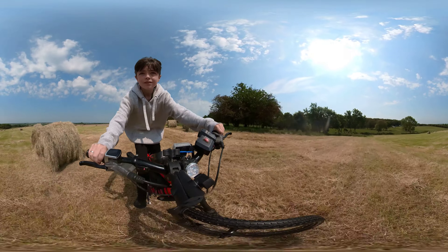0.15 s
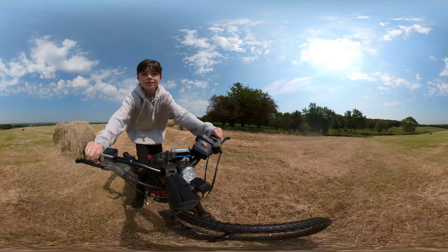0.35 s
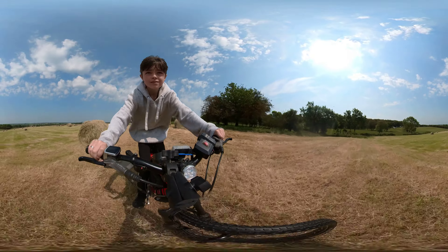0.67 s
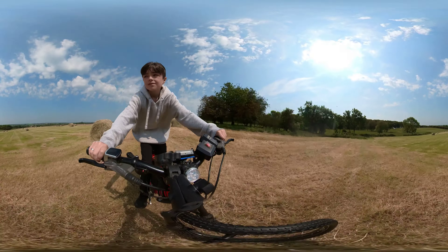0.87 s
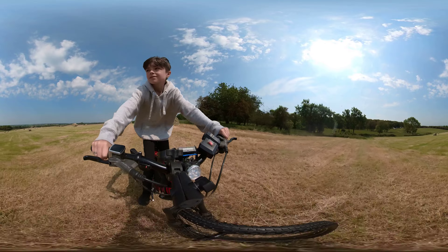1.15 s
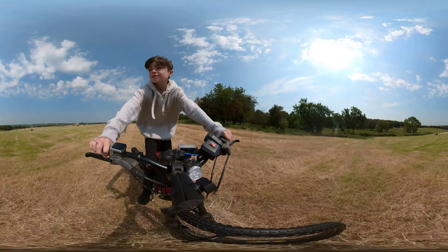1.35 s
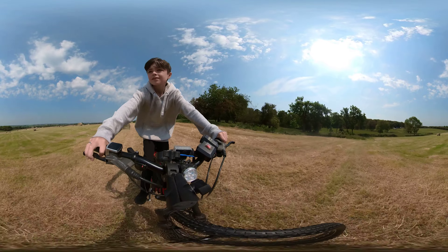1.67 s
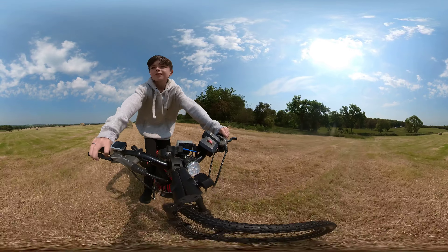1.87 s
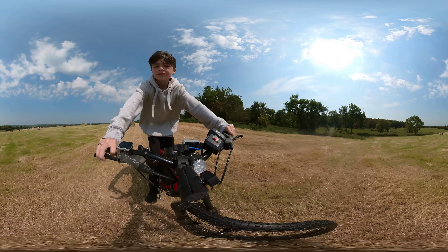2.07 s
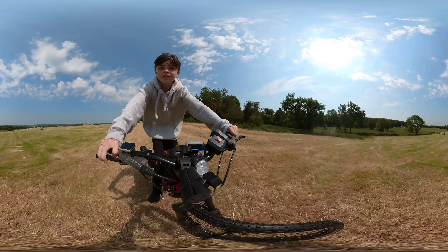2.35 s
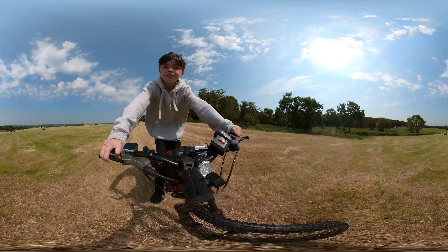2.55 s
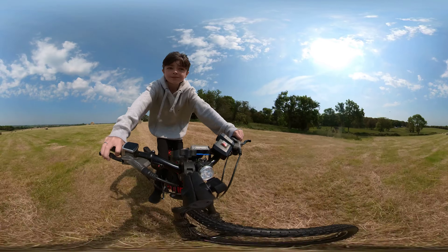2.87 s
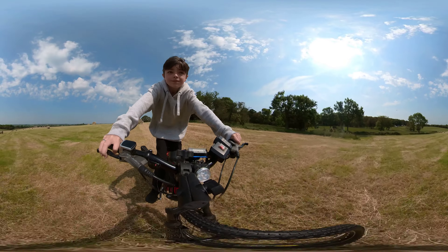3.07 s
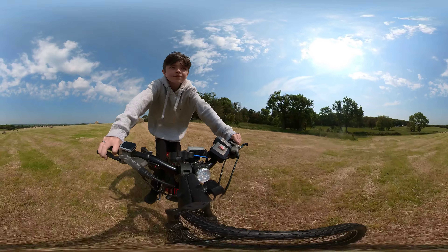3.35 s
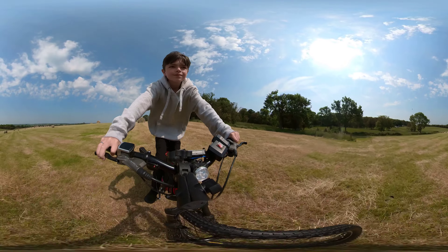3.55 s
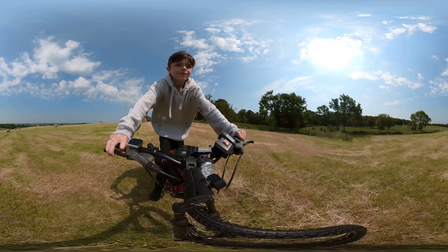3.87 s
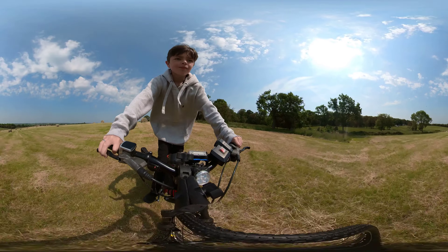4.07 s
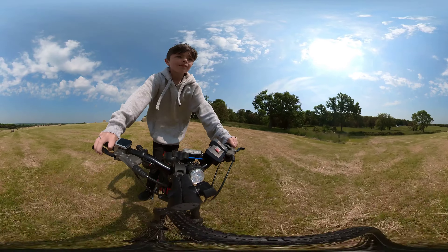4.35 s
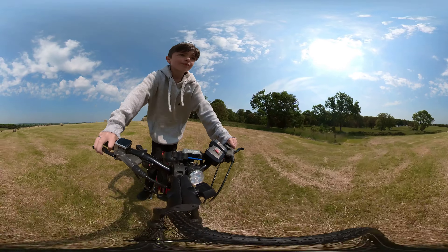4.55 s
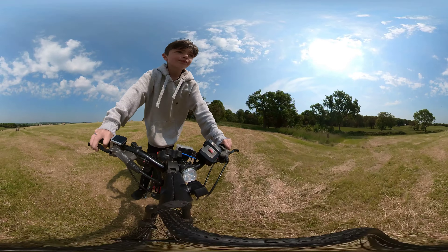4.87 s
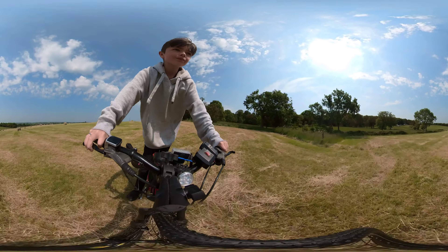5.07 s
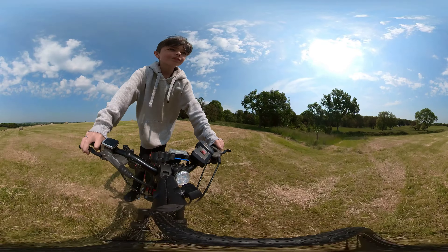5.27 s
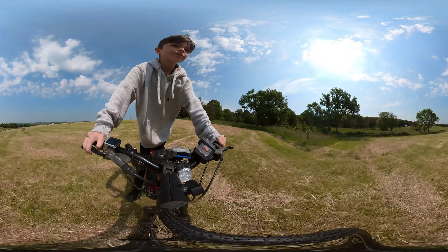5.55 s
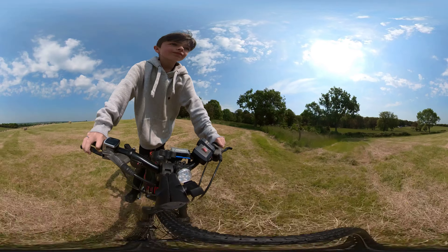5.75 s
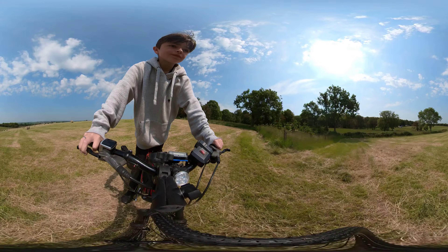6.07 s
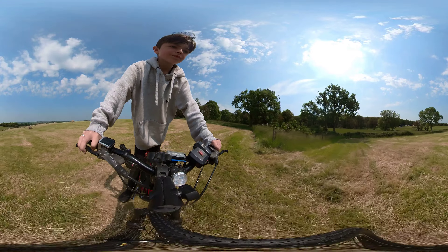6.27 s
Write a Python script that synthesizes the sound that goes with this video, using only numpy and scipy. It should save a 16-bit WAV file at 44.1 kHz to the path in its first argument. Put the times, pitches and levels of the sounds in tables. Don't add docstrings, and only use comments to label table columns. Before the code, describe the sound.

Close, dull on-bike sound outdoors: low wind buffets, rough ground rumble and dry crackling under knobbly tyres. Irregular knocks, hollow tube rings, tiny metal clinks and stalk snaps cluster throughout. A moderate crack hits the housing midway, later a much harder one with a faint falling squeak. Gusts weaken, rattles thin out, and a soft rut thump comes near the end.

```python
import sys
import numpy as np
from scipy import signal
from scipy.fft import rfft, irfft, next_fast_len
from scipy.io import wavfile
from scipy.ndimage import uniform_filter1d

SR = 44100
rng = np.random.default_rng(int(sys.argv[2]) if len(sys.argv) > 2 else 0)


def magnitude_from_level(level_db):
    exponent = np.asarray(level_db, float) / 20
    return 10 ** exponent


def inscribe(sig):
    pcm = np.round(np.clip(np.atleast_2d(sig).T, -1, 1) * 32767)
    wavfile.write(sys.argv[1], SR, pcm.astype(np.int16))


N = 282901

# start_s, hold_s, thump_db
GUSTS = [(0, 0.38, -34), (.5, 0.18, -29.5), (.8, 0.023, -34.5), (.98, .04, -29), (1.16, 0.046, -29),
         (1.32, 0.054, -30), (1.44, 0.14, -32.5), (1.62, 0.0053, -36), (1.77, 0.0073, -28.5),
         (1.86, 0.12, -29), (2.09, 0.022, -40), (2.27, 0.14, -33.5), (2.52, 0.035, -23.5),
         (2.69, 0.078, -27.5), (2.8, 0.14, -32), (3.11, 0.23, -35.5), (3.62, 0.11, -35),
         (3.92, 0.29, -35.5), (4.09, 0.15, -35), (4.35, 0.13, -36.5), (4.68, 0.08, -38.5),
         (4.83, 0.019, -42), (5.07, 0.082, -33), (5.3, 0.034, -36.5), (5.85, 0.11, -59),
         (6.055, 0.046, -37.5), (6.2, 0.066, -44)]
# start_s, flutter_db
SLAPS = [(0.451, -28.5), (0.727, -30), (0.797, -30.5), (0.873, -32), (0.978, -33), (1.21, -34.5),
         (1.319, -38), (1.446, -23), (1.53, -32), (1.619, -35.5), (1.8, -38), (1.927, -29.5),
         (2.089, -36.5), (2.299, -28.5), (2.37, -37), (2.551, -33), (2.694, -29.5), (2.977, -45),
         (3.118, -34), (3.362, -41.5), (3.729, -43), (4.089, -31.5), (4.409, -36.5), (4.47, -55),
         (4.69, -56), (5.077, -36), (6.06, -51)]
# time_s, level_db
BREEZE = [(0, -48), (2.0, -35), (3.0, -41.5), (4.5, -51.5), (5.5, -55.5), (5.9, -50.5), (6.0, -76),
          (6.41, -61)]
# freq_hz, density_db
GUST_SPECTRUM = [(8.8, -34), (17, 7.5), (35, -0.5), (54, 0.5), (98, -8), (171, -24), (231, -23),
                 (278, -24.5), (300, -22), (390, -33.5), (660, -120)]
# time_s, bumpiness_db, straw_db
GROUND = [(0.0, -44.5, -78.5), (0.23, -63, -77.5), (0.37, -50, -74), (0.77, -47, -76.5), (1.07, -50.5, -78),
          (1.21, -47.5, -72.5), (1.53, -44, -67), (1.71, -46.5, -67.5), (2.39, -44, -70.5),
          (2.78, -49, -72), (3.16, -44.5, -73.5), (3.41, -50.5, -75), (3.8, -44.5, -72.5),
          (4.27, -50.5, -72), (4.59, -50, -77.5), (5.19, -47.5, -74), (6.05, -56, -86.5),
          (6.41, -61, -90.5)]
# start_s, hold_s, depth_db
HOLLOWS = [(.07, .07, 6), (.62, .1, 3), (2.2, .07, 3), (3.02, .03, 5), (4.96, .07, 8), (5.44, .07, 7),
           (5.77, .07, 7), (5.92, .1, 7), (6.13, .05, 6), (6.29, .05, 8)]
# freq_hz, width_hz, level_db
FRAME_MODES = [(421, 137, -1), (536, 32, 8), (710, 520, -7), (826, 34, 5.5)]
# freq_hz, density_db
RUMBLE_SPECTRUM = [(94, -28.5), (160, -10.5), (231, -3.5), (289, 3.5), (355, -5), (537, -1), (708, -2.5),
                   (832, -7.5), (1000, -20.5), (1300, -45), (2200, -120)]
RUB_SPECTRUM = [(600, -22), (930, 1.5), (1060, -8), (1200, -3), (1380, -1), (1560, -6.5), (1700, -7.5),
                (1900, -13.5), (2470, -24.5), (4180, -120)]
CRACKLE_SPECTRUM = [(1000, -18), (1700, -3.5), (1840, -7), (2420, -10), (3130, -12), (3700, -20),
                    (4150, -33.5), (4610, -42), (5100, -39), (6630, -73), (11200, -120)]
HISS_SPECTRUM = [(2880, -46), (4900, -65), (5500, -10.5), (6510, 3), (7480, 8), (7940, 3), (8270, 1.5),
                 (8900, -15.5), (9370, -34), (12200, -69.5), (20600, -120)]
# pitch_hz, level_db, t60_s
METAL = [(4300, -28, .02), (5740, -17.5, .06), (6400, -11, .025), (6700, -6, .035), (7400, -14, .02),
         (7995, -6, .025)]
# start_s, hold_s, level_db
SHAKES = [(.28, 0.23, -29.5), (.8, 0.011, -32), (1.23, .02, -51), (1.55, 0.02, -30.5), (2.05, 0.034, -39),
          (2.3, 0.32, -38.5), (3.11, 0.43, -45), (3.68, 0.1, -43), (4.07, 0.0049, -27.5),
          (4.53, 0.012, -44), (4.86, 0.012, -57), (5.16, 0.012, -38), (5.6, 0.039, -57),
          (6.045, 0.012, -40.5)]
# pitch_hz, level_db
JINGLE = [(2250, -91.5), (6900, -93.5), (7990, -87.5)]
# start_s, thud_db, clack_rel_db, snap_rel_db, t60_s
KNOCKS = [(.14, -37, -1, -9, 0.15), (.258, -29, -16, -33, 0.025), (0.433, -40, -19, -17, 0.04),
          (.874, -31.5, -24, -39, 0.23), (.956, -21.5, 3, -25.5, 0.022), (1.244, -21.5, -36, -41, 0.013),
          (1.433, -27, 4, -15, 0.1), (1.476, -31, 19, -9, 0.049), (1.551, -22.5, 0, -20, 0.034),
          (1.986, -19.5, 2, -11, 0.0077), (2.071, -44, 7, 13.5, 0.0075), (2.334, -30, 17, -3, 0.011),
          (2.411, -38, 12, -13, 0.094), (2.463, -19.5, -8, -16, 0.011), (2.681, -37, -16, -11, 0.064),
          (3.561, -28, -2, -16, 0.015), (3.647, -32.5, -23, -15.5, 0.17), (3.809, -24, 7, -12, 0.015),
          (4.076, -19, 8.5, -11, 0.034), (4.329, -22, 5, -14, 0.061), (4.462, -28, -23, -13, 0.11),
          (5.062, -27.5, -2, -10.5, 0.033), (5.185, -26.5, 7, -20, 0.014), (5.285, -50, -9, 15.5, 0.024)]
# start_s, thud_db, brightness_db, t60_s
TAPS = [(0.855, -48, -8, 0.025), (1.047, -43.5, -5, .028), (1.791, -21.5, -9, 0.016),
        (1.892, -30, -30, 0.039), (2.039, -32, -1, 0.028), (2.144, -27.5, -10, 0.13),
        (2.498, -21, -8, 0.0086), (2.845, -27.5, -20, 0.042), (2.884, -27, -32, 0.11),
        (3.054, -24.5, -11, 0.021), (3.16, -23.5, -15, 0.029), (3.255, -26.5, -23, 0.01),
        (3.32, -29, -22, 0.019), (3.344, -29.5, -23, 0.071), (3.497, -26.5, -9, 0.031),
        (3.599, -30, 0, 0.014), (3.852, -44.5, 13, 0.017), (4.003, -20.5, -14, 0.027),
        (4.116, -30.5, -3, 0.1), (4.376, -30, -6, 0.064), (4.442, -31, -1, 0.075), (4.622, -33, -18, 0.03),
        (4.83, -35, 4, 0.068), (5.166, -24.5, -14, 0.056), (5.562, -35.5, -6, 0.11),
        (5.61, -29.5, -11.5, 0.072), (5.725, -33, -11, 0.057), (6.039, -32, -6.5, 0.053),
        (6.345, -37.5, -0.5, 0.3), (6.384, -24, -15.5, 0.12)]
# start_s, peak_db, t60_s, lean_to_high_db
CLINKS = [(0.1404, -60, 0.093, -1), (0.2388, -56, 0.022, 7), (0.5814, -63, 0.023, 6),
          (1.112, -64, 0.042, 8), (1.22, -51, 0.029, -9), (1.447, -37, 0.045, 5), (1.553, -40.5, 0.025, -8),
          (1.903, -52.5, 0.03, -3), (2.152, -48, 0.026, 5), (2.536, -68, 0.013, 6),
          (2.681, -50.5, 0.087, 3), (3.1556, -53, 0.016, 2), (3.1971, -56, 0.015, -10),
          (3.5616, -46.5, 0.037, -3), (3.646, -56.5, 0.029, 0), (3.684, -51, 0.022, 1),
          (3.75, -50, 0.014, 8), (3.808, -39.5, 0.037, -1), (3.9973, -58, 0.022, 3),
          (4.023, -52.5, 0.034, -3.5), (4.0788, -51, 0.042, -1), (4.335, -30.5, 0.031, 3),
          (4.4053, -56, 0.03, 16), (4.4625, -37.5, 0.036, 0), (5.07, -46, 0.048, 7),
          (5.186, -45.5, 0.03, 16), (5.287, -59, 0.012, 2), (5.3198, -56, 0.02, -3),
          (6.404, -50.5, 0.044, -2)]
# start_s, peak_db, pitch_hz, t60_s
TICKS = [(0.1411, -44.5, 2010, 0.016), (1.4341, -41.5, 2020, 0.015), (1.477, -37, 2480, 0.019),
         (1.5517, -37, 2410, 0.02), (1.6482, -54, 1990, 0.018), (1.6786, -49, 3000, 0.018),
         (1.7594, -55, 1940, 0.02), (1.9844, -39, 2120, 0.02), (2.0714, -36, 2280, 0.017),
         (2.144, -42, 1940, 0.018), (2.3331, -35, 2070, 0.016), (2.4119, -42, 1880, 0.026),
         (2.4637, -46, 2530, 0.025), (2.4992, -49, 2080, 0.02), (2.6224, -45, 1960, 0.02),
         (2.6823, -44, 2360, 0.02), (3.1535, -40, 2280, 0.0099), (3.3712, -44, 2050, 0.018),
         (3.4999, -41.5, 2020, 0.026), (3.561, -37, 1660, 0.036), (3.601, -43, 2000, 0.02),
         (3.6572, -34, 2020, 0.013), (3.6817, -41.5, 2440, 0.022), (3.8102, -34, 1860, 0.028),
         (4.0637, -42, 2120, 0.02), (4.0786, -52, 1980, 0.046), (4.3343, -34, 2430, 0.015),
         (4.3746, -41, 2010, 0.02), (4.4607, -38, 2240, 0.02), (4.6194, -53, 2180, 0.018),
         (4.782, -45, 2120, 0.02), (4.8745, -43.5, 1970, 0.019), (5.07, -39.5, 1720, 0.025),
         (5.183, -43, 2440, 0.024), (5.2889, -41, 1980, 0.022), (5.5618, -46.5, 2040, 0.018),
         (5.659, -48, 2000, 0.024), (6.0257, -57, 1990, 0.02), (6.042, -50, 2050, 0.022),
         (6.385, -39.5, 2020, 0.018)]
# start_s, peak_db, pitch_hz, t60_s
TUBES = [(0.211, -35, 632, 0.059), (0.257, -28, 514, 0.044), (0.333, -31, 580, 0.065),
         (0.855, -30.5, 597, 0.062), (0.875, -22.5, 600, 0.06), (0.957, -26, 660, 0.039),
         (1.185, -30, 656, 0.045), (1.245, -35, 590, 0.039), (1.447, -24, 690, 0.05),
         (1.4765, -21, 1530, 0.036), (1.4835, -18.5, 496, 0.053), (1.553, -19.5, 748, 0.043),
         (1.793, -36, 550, 0.05), (1.891, -26.5, 750, 0.029), (1.987, -37, 526, 0.046),
         (2.039, -27.5, 703, 0.026), (2.15, -44, 553, 0.036), (2.382, -42, 533, 0.05),
         (2.462, -34, 500, 0.038), (2.492, -25, 635, 0.044), (2.666, -29.5, 690, 0.039),
         (2.684, -22.5, 536, 0.066), (2.845, -43, 526, 0.05), (2.886, -31, 536, 0.047),
         (3.163, -31, 690, 0.05), (3.193, -29, 560, 0.035), (3.255, -31, 535, 0.037),
         (3.32, -29, 625, 0.036), (3.345, -28, 660, 0.056), (3.562, -31.5, 548, 0.17),
         (3.6, -30.5, 686, 0.088), (3.652, -21, 586, 0.037), (3.684, -24.5, 513, 0.058),
         (3.81, -20.5, 565, 0.056), (4.079, -32, 622, 0.035), (4.334, -26, 567, 0.19),
         (4.376, -29, 656, 0.047), (4.467, -23.5, 508, 0.046), (4.617, -29, 506, 0.052),
         (5.168, -26, 732, 0.049), (5.185, -27, 545, 0.086), (5.258, -36, 590, 0.055),
         (5.563, -36, 580, 0.062), (5.611, -30.5, 530, 0.055), (6.367, -34.5, 557, 0.11),
         (6.384, -26, 735, 0.044)]
# start_s, hold_s, level_db
SCUFFS = [(.22, 0.13, -39), (.37, 0.036, -34.5), (.43, 0.014, -31), (.47, 0.064, -38.5), (.87, 0.087, -35),
          (.95, 0.27, -35), (3.64, 0.1, -45), (4.67, 0.28, -45.5), (5.58, 0.15, -51.5),
          (6.21, 0.074, -46.5)]
# freq_hz, density_db
SCUFF_SPECTRUM = [(210, -41), (350, -1.5), (495, -4.5), (600, 6.5), (835, -10.5), (1040, -7), (1340, -4.5),
                  (1730, -20), (2200, -21.5), (2860, -51.5), (4840, -120)]
# start_s, peak_db, t60_s
RUTS = [
    (0.26, -32, 0.17),
    (6.051, -32, 0.097),
]
# start_s, peak_db, pitch_hz, t60_s
THUMPS = [(0.36, -36, 130, 0.1), (0.445, -30, 127, 0.16), (0.781, -37, 112, 0.096), (0.876, -29, 111, 0.15),
          (1.505, -36, 151, 0.098), (1.785, -30, 132, 0.12), (1.885, -28, 111, 0.12),
          (1.978, -32, 111, 0.12), (2.074, -37, 178, 0.11), (2.271, -40, 108, 0.14),
          (2.351, -35, 111, 0.13), (2.533, -43, 135, 0.12), (2.588, -22.5, 139, 0.092),
          (2.694, -45, 110, 0.12), (2.745, -34, 142, 0.21), (2.797, -29, 114, 0.11),
          (2.903, -25.5, 113, 0.098), (2.961, -40, 202, 0.12), (3.093, -40, 113, 0.11),
          (3.174, -34, 254, 0.15), (3.339, -37, 109, 0.13), (4.072, -36, 108, 0.11),
          (4.331, -33.5, 201, 0.14), (4.401, -39, 106, 0.14), (4.67, -37, 222, 0.15),
          (5.071, -43, 111, 0.14), (5.179, -34, 140, 0.1), (5.344, -47, 132, 0.12), (6.045, -48, 110, 0.12)]
# start_s, peak_db
CRACKS = [
    (2.4636, -18.5),
    (4.0793, -8.5),
]
# time_s, pitch_hz, level_db
SQUEAK = [
    (4.085, 2700, -85),
    (4.095, 2680, -63),
    (4.16, 2380, -63),
    (4.215, 2150, -66),
    (4.25, 2100, -90),
]

RUMBLE_DB, RUB_DB, CRACKLE_DB, HISS_DB, TREAD_DB = -40, -50.5, -64.5, -73, -60
JOLT_DB = 1.1


def rms_one(x):
    return x / np.sqrt(np.mean(x ** 2) + 1e-20)


def in_time(rows):
    s, *columns = np.transpose(rows)
    return [np.interp(np.arange(N) / SR, s, c) for c in columns]


def swells(rows, rise_db_s, fall_db_s):
    t = np.arange(0, N + 64, 64) / SR
    s, hold, level_db = np.transpose(rows)[:, :, None]
    loss_db = rise_db_s * np.maximum(s - t, 0) + fall_db_s * np.maximum(t - s - hold, 0)
    gain = np.sqrt(np.sum(magnitude_from_level(level_db - loss_db) ** 2, axis=0))
    return np.interp(np.arange(N) / SR, t, gain)


def drift(rate_hz):
    r = np.exp(-40 * np.pi * rate_hz / SR)
    slow = signal.lfilter([1], [1, -2 * r, r * r], rng.standard_normal(N // 20 + 4002))[4000:]
    return np.interp(np.arange(N) / 20, np.arange(len(slow)), rms_one(slow))


def butter(x, order, hz, kind="low"):
    return signal.sosfilt(signal.butter(order, hz, kind, fs=SR, output="sos"), x)


def colour(x, spectrum, size=16384):
    hz, level_db = np.transpose(spectrum)
    grid = np.log(np.arange(size // 2 + 1) * SR / size + 1)
    cepstrum = irfft(np.interp(grid, np.log(hz), level_db) * np.log(10) / 20)
    cepstrum[1:size // 2] *= 2
    response = irfft(np.exp(rfft(cepstrum[:size // 2], size)))[:size // 2]
    return signal.fftconvolve(x, response / np.linalg.norm(response))[:N]


def resonance(x, hz, width_hz):
    r = np.exp(-np.pi * width_hz / SR)
    poles = [1, -2 * r * np.cos(2 * np.pi * hz / SR), r * r]
    return signal.lfilter([(1 - r * r) / 2, 0, (r * r - 1) / 2], poles, x + 1e-18)


def evened(x, span_s, share):
    span = int(span_s * SR)
    power = uniform_filter1d(uniform_filter1d(x ** 2, span), span)
    return rms_one(x / (power + 1e-12) ** (share / 2))


def patchy(x, low_hz, high_hz, patch_db, rate_hz, count):
    size = next_fast_len(N)
    log_hz = np.log(np.arange(size // 2 + 1) * SR / size + 1)
    place = np.interp(log_hz, np.log([low_hz, high_hz]), [0, count - 1])
    whole = rfft(x, size)
    out = np.zeros(N)
    for k in range(count):
        band = irfft(whole * np.clip(1 - abs(place - k), 0, 1), size)[:N]
        out += band * magnitude_from_level(patch_db * drift(rate_hz))
    return out


def grains(per_s, spread_db, clump_db, smooth):
    sizes = magnitude_from_level(spread_db * np.minimum(rng.exponential(1, N), 5)) * rng.choice([-1, 1], N)
    born = rng.random(N) < per_s * magnitude_from_level(clump_db * drift(25)) / SR
    share = np.clip(smooth, 0, 1)
    return np.sqrt(1 - share) * rms_one(sizes * born) + np.sqrt(share) * rng.standard_normal(N)


def pings(per_s, cycles, count):
    sizes = magnitude_from_level(2.8 * np.minimum(rng.exponential(1, N), 4)) * (rng.random(N) < per_s / SR)
    dealt = rng.integers(0, count, N)
    out = np.zeros(N)
    for k, hz in enumerate(np.geomspace(900, 8600, count)):
        out += rms_one(resonance(sizes * (dealt == k), hz, hz / cycles)) * np.sqrt(hz)
    return rms_one(out)


def bursts(times_s, levels_db, t60s, rise):
    out, t = np.zeros(N + 4096), np.arange(4096) / SR
    chatter = rng.standard_normal((len(times_s), 4096))
    rows = zip(times_s, levels_db, np.maximum(t60s, .002), rise + 0 * times_s, chatter)
    for s, level_db, t60, share, noise in rows:
        at = int(s * SR)
        out[at:at + 4096] += magnitude_from_level(level_db - 60 * t / t60) * (1 - np.exp(-t / (share * t60))) * noise
    return out[:N]


def strikes(rows, gain_db, touch_s, partials):
    out, t = np.zeros(N + 4096), np.arange(4096) / SR
    luck = rng.uniform(0, 1, (len(rows), len(partials)))
    for (s, peak_db, hz, t60), chance in zip(rows, luck):
        tone = np.zeros(4096)
        for (ratio, db), c in zip(partials, chance):
            partial_hz = hz * ratio ** (1 + 0.24 * (c - .5))
            decay = magnitude_from_level(-60 * t * ratio / max(t60, .003))
            tone += magnitude_from_level(db) * np.sin(2 * np.pi * partial_hz * t) * decay
        at = int(s * SR)
        out[at:at + 4096] += magnitude_from_level(peak_db + gain_db) * (1 - np.exp(-t / touch_s)) * tone
    return out[:N]


def frame(x, ring_gain=1):
    modes = np.zeros(N)
    for k, (hz, width_hz, level_db) in enumerate(FRAME_MODES):
        modes += (-1) ** k * magnitude_from_level(level_db) * resonance(x, hz, width_hz)
    return colour(x + 1.82 * ring_gain * modes, RUMBLE_SPECTRUM)


def wind():
    pressure = magnitude_from_level(in_time(BREEZE)[0]) + swells(GUSTS, rise_db_s=500, fall_db_s=211.5)
    slap_rows = [(s, 0.00051, db) for s, db in SLAPS]
    slaps = swells(slap_rows, rise_db_s=447.5, fall_db_s=351.5)
    eddies = colour(rng.standard_normal(N), GUST_SPECTRUM)[::-1]
    eddies = butter(eddies, 2, 24, "high")
    thump = signal.sosfiltfilt(signal.butter(2, 70, fs=SR, output="sos"), eddies)
    flutter = evened(eddies - thump, 0.29, 0.74)
    push = pressure * evened(thump, 0.069, 0.99) + (magnitude_from_level(-16.5) * pressure + slaps) * flutter
    return push + 0.048 * butter(push ** 2, 1, 15, "high")


def ground_db():
    bumps_db, straw_db = (c - c.mean() for c in in_time(GROUND))
    light_db = 20 * np.log10(2.0 + swells(HOLLOWS, rise_db_s=149, fall_db_s=149))
    return bumps_db - light_db, straw_db, light_db


def stubble():
    bumps_db, straw_db, _ = ground_db()
    jolts = drift(1.2)
    stalks = 1.106 * grains(500, spread_db=-1.0, clump_db=3.5, smooth=0.25)
    stalks = stalks + .4 * pings(1200, cycles=43.0, count=30)

    shaken = frame(grains(300, spread_db=2.5, clump_db=3.5, smooth=0.55))
    rumble = magnitude_from_level(RUMBLE_DB + bumps_db + JOLT_DB * jolts) * evened(shaken, .03, .3)

    rubbing = grains(660, spread_db=3.5, clump_db=2.5, smooth=0.65) + 0.5 * stalks
    rub = magnitude_from_level(RUB_DB + 0.66 * bumps_db + 1.4 * JOLT_DB * jolts) * colour(rubbing, RUB_SPECTRUM)

    crackle_db = CRACKLE_DB + 0.22 * bumps_db + 0.85 * straw_db
    crackle = magnitude_from_level(crackle_db + 0.3 * jolts + 2.6 * drift(32)) * colour(stalks, CRACKLE_SPECTRUM)

    straw = 0.25 * stalks + 0.64 * grains(1800, spread_db=2.0, clump_db=4, smooth=0.7)
    flicker_db = 3.0 * drift(120)
    hiss = magnitude_from_level(HISS_DB + straw_db + .6 * jolts + flicker_db) * colour(straw, HISS_SPECTRUM)
    metal = sum(magnitude_from_level(4 * drift(8)) * resonance(hiss, hz, 60) for hz, _, _ in METAL[1:])
    hiss = .95 * hiss + .6 * metal
    return patchy(rumble + rub + crackle + hiss, 131, 11100, patch_db=2.4, rate_hz=10, count=24)


def tread():
    light_db = ground_db()[2]
    drone = resonance(resonance(rng.standard_normal(N), 1313, 286), 1313, 286)
    return magnitude_from_level(TREAD_DB - .6 * light_db + 3 + 2.4 * drift(18)) * rms_one(drone)


def pole():
    hz, width_hz, idle_db = 283.8, 15, -8.5
    hum = resonance(resonance(rng.standard_normal(N), hz, width_hz), hz, width_hz)
    idle = magnitude_from_level(RUMBLE_DB + ground_db()[0] + idle_db)
    shaken = swells(SHAKES, rise_db_s=599, fall_db_s=146.5) + idle
    return magnitude_from_level(-10.5) * shaken * evened(hum, 0.03, 0.4)


def jingle():
    out = np.zeros(N)
    for hz, level_db in JINGLE:
        out += magnitude_from_level(level_db + 4 * drift(7.7)) * rms_one(resonance(rng.standard_normal(N), hz, 70))
    return out


def knocks():
    tap_early_s, contact_lag_s = .001, .001
    taps = [(s - tap_early_s, db, 12.5 + bright, -11 + bright, t60) for s, db, bright, t60 in TAPS]
    s, blow_db, clack_db, snap_db, t60 = np.transpose(KNOCKS + taps)
    s = s + contact_lag_s
    swell = np.repeat([.038, .1], [len(KNOCKS), len(taps)])
    thud = frame(bursts(s, blow_db - 3.0, 1.55 * t60, rise=swell), ring_gain=.35)
    clack = colour(bursts(s, blow_db + clack_db - 16.0, 1.07 * t60, rise=swell), RUB_SPECTRUM)
    snap = colour(bursts(s, blow_db + snap_db - 3.5, 0.93 * t60, rise=swell), CRACKLE_SPECTRUM)
    return thud + clack + snap


def clinks():
    s, peak_db, t60, lean_db = np.transpose(CLINKS)
    luck = rng.standard_normal((len(s), len(METAL)))
    out = colour(bursts(s, peak_db - 6.5, t60, rise=0.047), HISS_SPECTRUM)
    for k, (hz, level_db, ring_s) in enumerate(METAL):
        side = np.clip(np.log2(hz / 7300) * 4, -.5, .5)
        part_db = peak_db + level_db + side * lean_db + 2 * luck[:, k]
        rows = list(zip(s, part_db, hz + 30 * luck[:, -k], 0.42 * (ring_s + t60)))
        out += magnitude_from_level(2 * drift(150)) * strikes(rows, 4, .002, [(1, 0)])
    return out


def ticks():
    rows = [(s, min(db, -37), hz, t60) for s, db, hz, t60 in TICKS]
    return strikes(rows, -4.5, 0.00054, [(1, -1.5), (1.0, -3), (1.3, -2.5), (1.55, -23)])


def tubes():
    return butter(strikes(TUBES, -2.4, 0.0008, [(1, 0), (1.35, -11), (2.4, -15.5)]), 4, 2400)


def scuffs():
    gain = magnitude_from_level(-6.0) * swells(SCUFFS, rise_db_s=448, fall_db_s=399)
    return gain * colour(rng.standard_normal(N), SCUFF_SPECTRUM)


def ruts():
    s, peak_db, t60 = np.transpose(RUTS)
    return butter(bursts(s, peak_db + 16.5, t60, rise=0.032), 2, [90, 240], "band")


def thumps():
    return strikes(THUMPS, 0.66, 0.0038, [(1, -1), (1.4, -5)])


def cracks():
    push = np.zeros(N)
    s, peak_db = np.transpose(CRACKS)
    push[(s * SR).astype(int)] = magnitude_from_level(peak_db + 29)
    blunt = butter(push, 4, 1000)
    return butter(blunt, 1, 220, "high") + 0.007 * colour(push, CRACKLE_SPECTRUM)


def squeak():
    hz, level_db = in_time(SQUEAK)
    phase = 2 * np.pi * np.cumsum(hz + 40 * drift(90)) / SR
    return magnitude_from_level(level_db + 3 * drift(60)) * np.sin(phase)


def scene():
    riding = wind() + stubble() + tread() + pole() + jingle()
    contacts = knocks() + clinks() + ticks() + tubes() + scuffs() + ruts() + thumps()
    return (riding + contacts + cracks() + squeak())[None]


def top_cut(x):
    return signal.sosfilt(signal.butter(12, 9520, fs=SR, output="sos"), x)


def record(dry):
    floor_db, cutoff_hz = -99.5, 13000
    wet = dry + magnitude_from_level(floor_db) * rng.standard_normal(dry.shape)
    return top_cut(butter(wet, 10, cutoff_hz))


dry = scene()
out = record(dry)
inscribe(out)
```